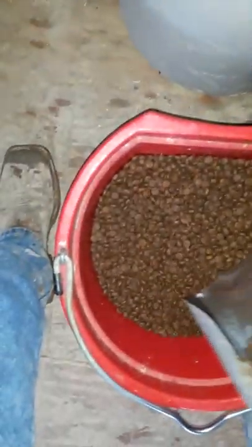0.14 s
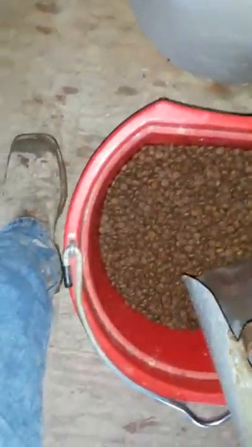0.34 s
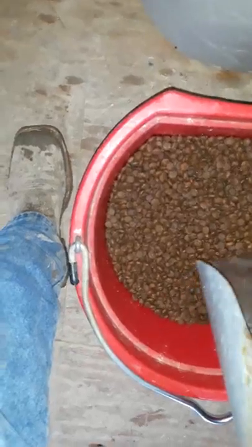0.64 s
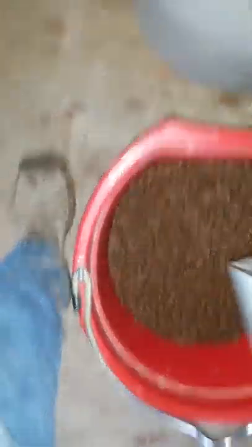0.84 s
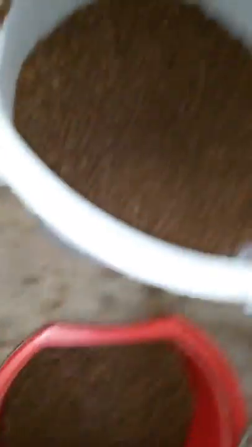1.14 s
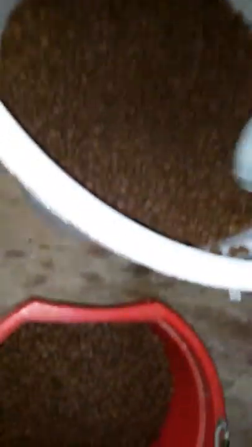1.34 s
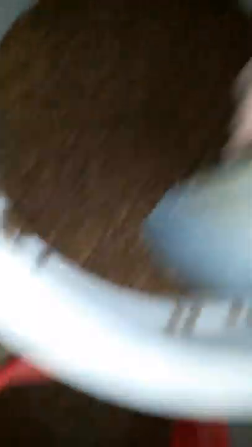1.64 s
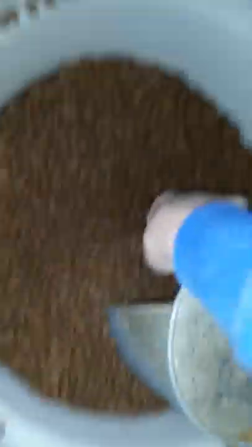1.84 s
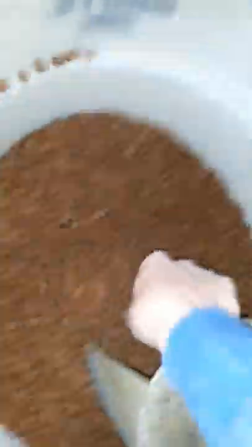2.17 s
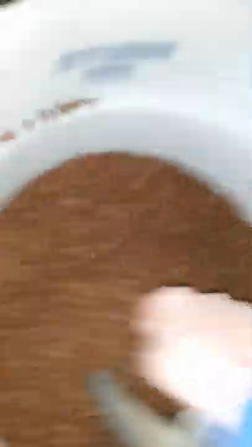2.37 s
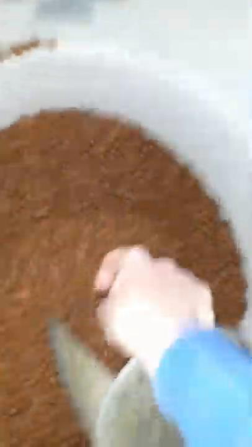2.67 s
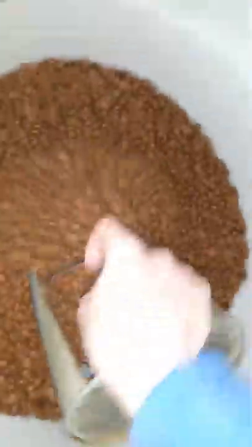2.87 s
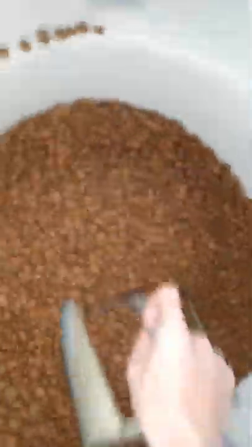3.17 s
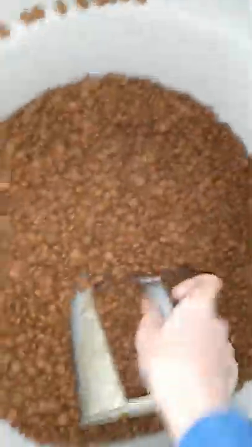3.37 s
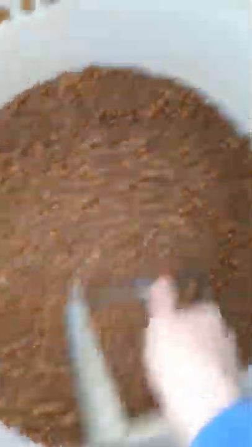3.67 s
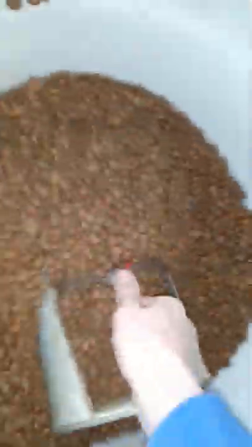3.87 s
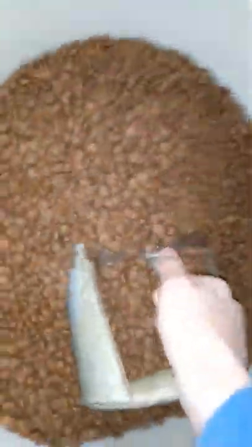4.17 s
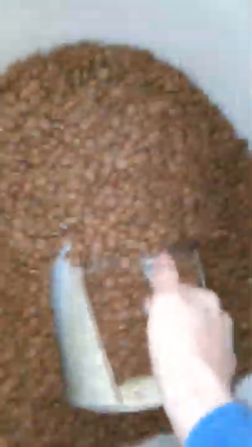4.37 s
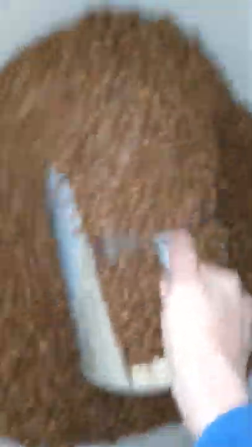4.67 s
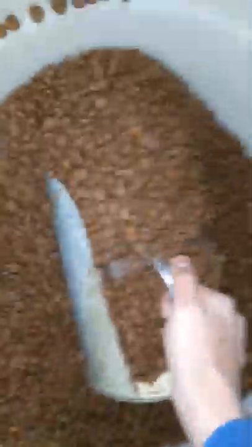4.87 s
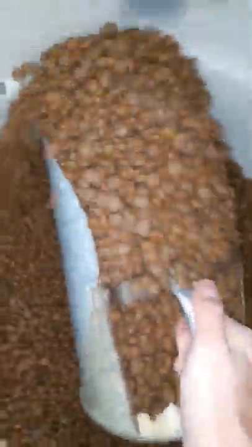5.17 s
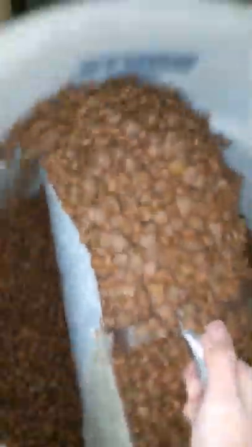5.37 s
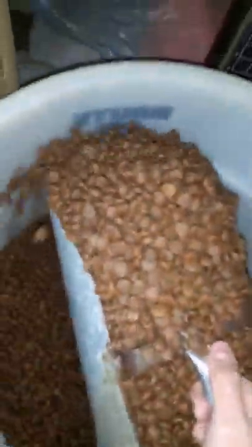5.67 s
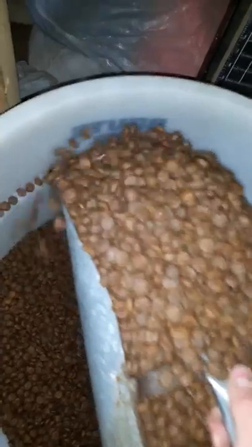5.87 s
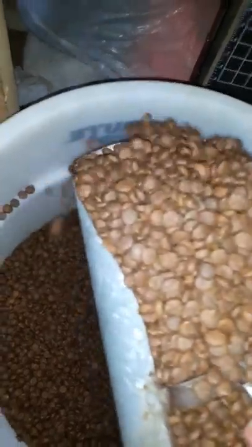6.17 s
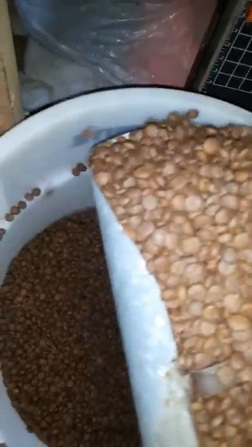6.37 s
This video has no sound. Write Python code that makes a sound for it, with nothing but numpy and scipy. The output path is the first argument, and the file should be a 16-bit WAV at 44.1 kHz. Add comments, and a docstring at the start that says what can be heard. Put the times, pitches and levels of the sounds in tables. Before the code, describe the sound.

Close and dry, with little reverberation: a very short burst of pellets hits a plastic bucket and a metal scoop hums on, dying away. Quiet, then a sudden gritty plunge into a barrel of dry pellets, repeated rough shoves making the barrel thud low. The grinding softens into dull, muffled crunches, and finally a bright slide and hollow patter of falling pellets thins to single sharp ticks.

```python
"""You hear dry pellets slide off a steel scoop into a plastic bucket, and the empty scoop rings on.
The scoop plunges into a plastic barrel of kibble, shoved in so the barrel booms, then comes up heaped
as surplus patters back onto the pile. Pellets are streams of tiny random clicks, filtered to a colour;
steel and barrel are fading resonances; a sleeve rustle and a hiss are filtered noise."""
import sys
import numpy as np
from scipy import signal
from scipy.fft import rfft, irfft, next_fast_len
from scipy.io import wavfile
from scipy.ndimage import uniform_filter1d

SR = 44100
rng = np.random.default_rng(int(sys.argv[2]) if len(sys.argv) > 2 else 0)


def to_wav(s):
    """Save 16-bit WAV."""
    ch = np.atleast_2d(s).T  # columns
    pcm = np.round(np.clip(ch, -1, 1) * 32767)  # PCM
    wavfile.write(sys.argv[1], SR, pcm.astype(np.int16))


N = 287091

# All levels in the tables are relative: each source also has an overall gain in its own function.

# Pellets as the scoop rises. Each row: time in seconds, sliding clicks in dB, patter on the pile in dB.
LIFT = [(4.99, -39.5, -36), (5.04, -41.5, -26), (5.21, -41, -32.5), (5.65, -32.5, -36), (5.87, -38, -41),
        (5.925, -42, -52), (5.99, -36.5, -39.5), (6.17, -36.5, -41.5), (6.25, -43.5, -46.5),
        (6.51, -40, -43.5)]
# How busy the pellets are. Each row: time in seconds, collisions per second before a stream's own factor.
TRAFFIC = [(0, 6000), (.25, 595), (1.45, 517), (1.51, 12000), (2, 4000), (3.25, 4000), (3.4, 510),
           (3.7, 3500), (5.1, 2400), (5.8, 1407), (6.5, 434)]
# Where the pellets lie. Each row: time in seconds, bearing from -1 (right) to 1 (left).
BEARING = [(0, 0.0687), (3.2, 0.012), (3.7, .8), (6.5, 0.432)]
# The scoop jolts against the packed pile. Each row: time in seconds, barrel boom peak in dB,
# scoop clunk peak in dB.
JOLTS = [(1.620, -6.5, -3), (1.642, -10.5, -24.5), (2.172, -5.5, -6.5), (2.294, -24, -18.5),
         (2.322, -21.5, -17.5), (2.365, -20.5, -19.5), (2.385, -11.5, -30), (2.710, -35.5, -24),
         (3.663, -40, -18), (3.672, -42.5, -14), (3.687, -54.5, -17.5), (4.711, -43, -19),
         (5.041, -29, -23.5)]
# Single pellets that stand out. Each row: time in seconds, level in dB.
TICKS = [(0.2059, -57.5), (0.406, -32.5), (1.924, -34.5), (1.952, -21.5), (3.305, -24.5), (3.374, -29.5),
         (3.4065, -38), (4.8915, -19.5), (5.3458, -22.5), (5.8336, -17), (5.9567, -19), (6.0088, -15.5),
         (6.2552, -22), (6.2766, -23), (6.309, -22), (6.3697, -18), (6.4125, -16.5), (6.4228, -15)]
# Tones of the empty steel scoop. Each row: pitch in Hz, level in dB, time to fade by 60 dB in seconds.
STEEL = [(328, -11.5, 1.4), (572, -16, .4), (603, -8.5, .4), (858, -26, .5), (1098, -13.5, .78),
         (1427, -14.5, .7), (1637, -21, .6), (1863, -21, .7), (1938, -7, .3), (2046, -11, .37),
         (2100, -12, .45), (2536, -3, .18), (2648, -8, .2)]
# Resonances of the loaded barrel. Each row: pitch in Hz, width in Hz, level in dB.
BARREL = [(128, 24, -4), (188, 38, -5.5), (250, 50, -4.5), (311, 15, 7.5), (470, 70, -14)]
# Resonances of the scoop, damped by pellets around it. Each row: pitch in Hz, width in Hz, level in dB.
BURIED = [(551, 70, -2), (671.2, 38, 7), (872.5, 48, -2.5), (938, 100, -3)]

# Colours: how strong each pitch is. Each row of these tables: pitch in Hz, level in dB.
# Pellets falling into the bucket.
BUCKET = [(150, -58), (250, -21.5), (325, -12.5), (519, -27), (607, -7), (735, -27.5), (1080, -20),
          (2090, -7), (2360, -11.5), (2570, -9.5), (6940, -12.5), (8260, -24), (16000, -24.5)]
# Pellets grinding on the scoop.
CRUNCH = [(290, -18), (500, 0), (807, -6), (946, -4.5), (1230, -10.5), (1930, -5), (3200, -5), (4340, -2),
          (5970, -5.5), (7100, -1), (8700, -16), (12500, -7), (15100, -16), (16000, -33.5)]
# The scoop clattering before it is buried.
PLUNGE = [(120, -32), (200, -21.5), (289, 9), (366, -25.5), (601, -4), (696, -6.5), (806, -2.5),
          (1270, -5.5), (1980, 1.5), (3830, -0.5), (4770, -3.5), (11900, -11), (16000, -24)]
# The dull thrum of the pile.
THRUM = [(29, -51), (50, -40), (80, -22.5), (124, -10), (180, -16.5), (255, 0.5), (355, -3.5), (1050, -7),
         (1380, -8), (1940, -5), (2400, -9.5), (3120, -25), (5280, -120)]
# The first surplus landing on the pile.
COLLAPSE = [(88, -81), (150, -22), (315, -20), (345, -8.5), (532, -7.5), (640, -3), (927, 3.5), (1260, -11),
            (2850, -12.5), (3300, -17.5), (6000, -35), (7800, -72.5), (13200, -120)]
# Pellets sliding on the scoop.
SLIDE = [(650, -45.5), (1100, -8), (1410, 1), (1720, -2.5), (1970, -0.5), (3570, -5), (4030, -1.5),
         (7060, -2), (8840, -13), (12000, -3.5), (15100, -13.5), (16000, -12)]
# The deeper pats that follow.
PATTER = [(59, -59), (100, -26), (226, -16.5), (274, -9), (444, -14.5), (581, -2), (800, 3), (1060, -7.5),
          (1300, -30.5), (1690, -25), (2860, -120)]
# The background hiss.
AIR = [(30, -0.5), (200, 0.5), (480, 11), (750, 0.5), (2000, 0), (7200, -11), (8500, -16.5), (16000, -24)]

# The scoop first cuts into the pile. One row: start in seconds, attack in seconds, hold in seconds,
# release time constant in seconds, crunch in dB, barrel boom in dB.
STAB = (1.499, 0.0113, 0.0994, 0.0004, -14.5, -36.5)
# Hard shoves. Each row: time at full force in seconds, hold in seconds, creep of pellets while
# the hand leans in, in dB, crunch in dB, barrel boom in dB.
SHOVES = [(1.65, 0.1619, -25, -17.5, -23.5), (1.852, 0.0226, -30, -31, -26.5),
          (2.114, 0.0534, -30, -19.5, -25), (2.399, 0.0537, -30, -18, -25),
          (2.668, 0.04774, -37, -21.5, -26.5), (2.925, 0.0506, -37.5, -19, -26.5),
          (3.007, .004, -45.5, -22.5, -51), (3.046, 0.0032, -45.5, -31, -50.5),
          (3.186, 0.0224, -36, -18.5, -32.5), (3.233, 0.0125, -48, -26, -42)]
# Gentler wiggles with the scoop buried. Each row: time at full force in seconds, hold in seconds,
# crunch in dB, thrum of the pile in dB.
WIGGLES = [(3.66, 0.0432, -36.5, -35), (3.763, 0.0294, -25, -30.5), (3.956, 0.034, -29.5, -33.5),
           (4.115, 0.004, -39.5, -39.5), (4.242, 0.0132, -28.5, -35), (4.366, 0.027, -30, -36),
           (4.473, 0.0832, -34.5, -32), (4.597, 0.0328, -30, -32.5), (4.714, 0.0492, -29, -34)]
# Pellets settling between the shoves. Each row: time in seconds, level in dB.
DIG_SETTLING = [(1.5, -60), (1.65, -54), (1.96, -34), (2.23, -49), (2.8, -46), (3.28, -52.5), (3.36, -60.5),
                (3.6, -74.5)]
# Pellets settling between the wiggles. Each row: time in seconds, level in dB.
FILL_SETTLING = [(3.6, -63), (3.645, -46), (3.92, -45.5), (4.17, -50), (4.4, -35.5), (4.78, -36),
                 (4.92, -42.5), (4.99, -44)]

MIC_LAG_S = .0004  # delay between the two microphones at bearing 1
TOP_HZ = 16200  # nothing is heard above this
RISE_DB_PER_S, FALL_DB_PER_S = 419, 403  # how fast a stroke takes hold and lets go
LEAN_S = 0.1202  # the hand leans in for this long before a shove
BOOM_LAG_S, BOOM_FALL_DB_PER_S = .008, 395.5  # the barrel answers late; how fast its shaking stops
SETTLING_BOOM_DB, SETTLING_THRUM_DB = -5, -2.5  # dull part of the settling, over its crunch gain


def amp(db):
    """Turn decibels into a gain."""
    return 10 ** (np.asarray(db) / 20)


def unit(x):
    """Scale to an average strength (rms) of 1."""
    return x / np.sqrt(np.mean(x ** 2) + 1e-20)


def follow(rows):
    """Draw straight lines through (seconds, value) rows, one value per sample."""
    return np.interp(np.arange(N) / SR, *np.transpose(rows))


def gains(rows):
    """Give one gain per sample for each dB column, practically silent outside the rows."""
    t = np.arange(N) / SR
    times, *columns = np.transpose(rows)
    return [amp(np.interp(t, times, column, left=-120, right=-120)) for column in columns]


def through(x, response):
    """Filter a sound by convolving it with an impulse response."""
    return signal.fftconvolve(np.atleast_2d(x), np.atleast_2d(response), axes=1)[:, :N]


def colour(points, size=4096):
    """Build a filter of energy 1 with the given colour, which never answers before its input."""
    hz, db = np.transpose(points)
    log_hz = np.log(np.fft.rfftfreq(size, 1 / SR) + 1)
    gain = amp(np.interp(log_hz, np.log(hz + 1), db))
    # Folding the cepstrum forward gives the minimum-phase filter.
    cepstrum = irfft(np.log(np.maximum(gain, 1e-6)))
    cepstrum[1:size // 2] *= 2
    cepstrum[size // 2 + 1:] = 0
    response = irfft(np.exp(rfft(cepstrum)))
    return response / np.linalg.norm(response)


def shift_colour(x, before, after, start, end):
    """Pass the colour of a sound from one spectrum to another between two times."""
    turn = follow([(start, 0), (end, np.pi / 2)])
    return through(x * np.cos(turn), colour(before)) + through(x * np.sin(turn), colour(after))


def body(modes, detune=1):
    """Ring a struck object: a sum of fading tones, of energy 1; wider resonances fade faster."""
    t = np.arange(SR // 2) / SR
    response = np.zeros(len(t))
    for k, (hz, width, db) in enumerate(modes):
        tone = np.exp(-np.pi * width * t) * np.sin(2 * np.pi * hz * detune * t)
        response += (-1) ** k * amp(db) * width * tone
    return response / np.linalg.norm(response)


def aside(x, bearing):
    """Place a sound on the left: it reaches the right microphone a little later."""
    return np.array([x, np.roll(x, round(bearing * MIC_LAG_S * SR))])


def add_shapes(starts, shapes):
    """Add up short shapes in both channels, each from its own start sample."""
    index = np.arange(shapes.shape[1])
    return np.array([np.bincount((start + index).ravel(), shapes.ravel(), N)[:N] for start in starts])


def clicks(times, sizes, bearing=0, scatter=1, life=0.0001292, size=48):
    """Make tiny collisions, each with a random pitch and direction; life is the fade time in seconds."""
    pitch, phase, stray = rng.random((3, len(times), 1))
    t = np.arange(size) / SR
    shapes = np.exp(-t / life) * np.cos(2 * np.pi * (pitch * TOP_HZ * t + phase))
    shapes *= sizes[:, None] / np.linalg.norm(shapes, axis=1, keepdims=True)
    lag = MIC_LAG_S * (np.reshape(bearing, (-1, 1)) + scatter * (2 * stray - 1))
    starts = [np.abs((times[:, None] + side * lag / 2) * SR).astype(int) for side in (-1, 1)]
    return add_shapes(starts, shapes)


def pellets(busy, spread_db, clump_db, scatter=0.39):
    """Stream random collisions of rms 1: sizes vary, and slow noise bunches them into tiny avalanches."""
    rate = np.maximum(busy * follow(TRAFFIC), 1)
    hit = np.flatnonzero(rng.random(N) < rate / SR)
    clumps = unit(uniform_filter1d(rng.standard_normal(N), size=300))
    strength_db = spread_db * np.minimum(rng.standard_normal(N), 2) + clump_db * clumps
    sizes = amp(strength_db) / np.sqrt(rate)  # busier streams have smaller clicks
    return unit(clicks(hit / SR, sizes[hit], follow(BEARING)[hit], scatter))


def surround_noise():
    """Make noise from all sides: alike at both microphones in the bass, unrelated in the treble."""
    size = next_fast_len(N)
    alike = np.sinc(2 * MIC_LAG_S * np.fft.rfftfreq(size, 1 / SR))
    shares = np.sqrt([(1 + alike) / 2, (1 - alike) / 2])
    mid, side = irfft(rfft(rng.standard_normal((2, size))) * shares, size)[:, :N]
    return np.array([mid + side, mid - side])


def walls(x, t60, wet_db):
    """Scatter clicks off close walls: a short noise wash follows their energy, total kept about the same."""
    decay = amp(-60 * np.arange(SR // 4) / SR / t60) ** 2
    energy = through(np.mean(x ** 2, axis=0), decay / decay.sum())
    wash = np.sqrt(np.abs(energy)) * surround_noise()
    return (x + amp(wet_db) * wash) / np.hypot(1, amp(wet_db))


def room(x, t60, wet_db, low_hz=600, size=12000):
    """Add the answer of the nearby surroundings: a fading noise tail that returns little bass."""
    tail = surround_noise()[:, :size] * amp(-60 * np.arange(size) / SR / t60)
    bright = signal.sosfilt(signal.butter(2, low_hz, "highpass", fs=SR, output="sos"), x[0])
    return x + amp(wet_db) * through(bright, tail / np.linalg.norm(tail[0]))


def together(parts):
    """Combine the gains of unrelated pellet movements: their powers add."""
    return np.sqrt(sum(part ** 2 for part in parts))


def stroke(start, hold, db, fall_db_per_s):
    """Shape one push of the hand: it takes hold, stays at full force and lets go."""
    t = np.arange(N) / SR - start
    rising = RISE_DB_PER_S * np.maximum(-t, 0)
    falling = fall_db_per_s * np.maximum(t - hold, 0)
    return amp(db - rising - falling)


def air():
    """A very faint, even background hiss: coloured random noise."""
    return amp(-68.5) * through(rng.standard_normal((2, N)), colour(AIR))


def sleeve(fastest_s=1.17, width_s=.36):
    """The sleeve rustles faintly as the arm swings from bucket to barrel, loudest when fastest."""
    speed = np.exp(-((np.arange(N) / SR - fastest_s) / width_s) ** 2)
    return amp(-66) * speed * through(surround_noise(), colour(CRUNCH))


def ticks(bounce_s=0.0016, count=3):
    """Single pellets strike steel or plastic and chatter for an instant, each bounce 2 dB weaker."""
    s, db = np.transpose(TICKS)
    order = np.arange(count)
    times = s[:, None] + bounce_s * order * rng.uniform(0.66, 1, (len(s), count))
    strikes = clicks(times.ravel(), amp(db[:, None] - 2 * order).ravel())
    return amp(8.5) * through(walls(strikes, t60=0.0885, wet_db=-6.0), colour(SLIDE))


def clacks(per_s=90, middle_hz=1900, spread_octaves=.55, spread_db=3.5, life_s=.0025, size=900):
    """Pellets that fall clear of the scoop land with short pitches of their own; dry ones hardly ring."""
    slide, _ = gains(LIFT)
    hit = np.flatnonzero(rng.random(N) < per_s / SR)
    pitch, strength, bearing = rng.standard_normal((len(hit), 3)).T[:, :, None]
    t = np.arange(size) / SR
    hz = middle_hz * 2 ** (spread_octaves * pitch)
    rings = amp(spread_db * strength) * np.exp(-t / life_s) * np.sin(2 * np.pi * hz * t)
    lag = np.tanh(bearing) * MIC_LAG_S * SR / 2
    starts = [np.abs(hit[:, None] + side * lag).astype(int) for side in (-1, 1)]
    return amp(-5.5) * slide * unit(add_shapes(starts, rings))


def scoop_ring(attack_s=0.025):
    """Freed of its load, the steel rings as a sum of fading tones; its lowest tone lasts longest."""
    t = np.arange(N) / SR
    phases = rng.uniform(0, 2 * np.pi, len(STEEL))
    sides = np.array([[1], [-1]])
    lags = rng.uniform(-.22, .22, len(STEEL))[:, None, None] * MIC_LAG_S * sides
    ring = np.zeros((2, N))
    for (hz, db, t60), phase, lag in zip(STEEL, phases, lags):
        fade = amp(db - 60 * np.maximum(t - .06, 0) / t60)  # fading starts at 0.06 s
        ring += fade * np.sin(2 * np.pi * hz * (t + lag) + phase)
    return amp(-32.0) * ring * (1 - np.exp(-t / attack_s))


def pour():
    """The stream into the bucket thins out fast; a few stragglers follow, fading more slowly."""
    t = np.arange(N) / SR
    main_stream = amp(-15.5 - 224.3 * t)  # falls by 224.3 dB per second
    stragglers = amp(-40 - 72 * t)
    level = together([main_stream, stragglers])
    stream = level * pellets(busy=1.1, spread_db=5, clump_db=2.5)
    return amp(-5.0) * through(walls(stream, t60=.12, wet_db=-1.0), colour(BUCKET))


def lift():
    """Surplus pellets fall back with bright clicks and hollow pats that deepen as the scoop comes free."""
    slide, patter = gains(LIFT)
    sliding = slide * pellets(busy=1.2, spread_db=3.5, clump_db=2.35)
    sliding = walls(sliding, t60=0.03, wet_db=2.5)
    landing = patter * pellets(busy=.9, spread_db=2.5, clump_db=0.48, scatter=0.88)
    landing = walls(landing, t60=0.2, wet_db=-3.5)
    pats = shift_colour(landing, COLLAPSE, PATTER, start=5.062, end=5.3)
    return amp(3.5) * through(sliding, colour(SLIDE)) + amp(2.0) * pats


def filling_effort():
    """Gains of crunch and thrum: the pile starts to move again, with wiggles over its settling."""
    settling, = gains(FILL_SETTLING)
    moving = follow([(FILL_SETTLING[0][0], 0), (FILL_SETTLING[1][0], 1)])
    crunch, thrum = [settling], [amp(SETTLING_THRUM_DB) * settling]
    for s, hold, crunch_db, thrum_db in WIGGLES:
        crunch.append(stroke(s, hold, crunch_db, FALL_DB_PER_S))
        thrum.append(stroke(s, hold, thrum_db, BOOM_FALL_DB_PER_S))
    return moving * together(crunch), moving * together(thrum)


def fill():
    """Deep in the pile the scoop crunches more softly over a dull thrum: two coloured pellet streams."""
    crunch, thrum = filling_effort()
    grinding = walls(crunch * pellets(busy=.9, spread_db=5, clump_db=1.8), t60=.05, wet_db=-2)
    shifting = thrum * pellets(busy=.3, spread_db=1.5, clump_db=-1.5)
    return amp(2.5) * through(grinding, colour(CRUNCH)) + amp(2.0) * through(shifting, colour(THRUM))


def jolts(contact_s=0.000374, boom_lag_s=0.0047):
    """The scoop slips and stops: a short clunk of buried steel, then the push reaches the barrel wall."""
    out = np.zeros(N + SR)
    t = np.arange(SR // 50) / SR
    push = t / contact_s * np.exp(-t / contact_s)
    boom = np.convolve(body(BARREL), push)
    detunes = rng.normal(1, 0.0743, len(JOLTS))  # each clunk has its own pitch
    for (s, boom_db, clunk_db), detune in zip(JOLTS, detunes):
        clunk = body(BURIED, detune)
        for start, db, ring in (s, clunk_db, clunk), (s + boom_lag_s, boom_db, boom):
            out[round(start * SR):][:len(ring)] += amp(db) * ring / np.abs(ring).max()
    # The left channel is slightly louder and hears it first.
    return aside(out[:N], bearing=0.533) * amp([[.9], [-.9]])


def digging_effort():
    """Gains of crunch and boom: one sudden stab, then shoves that each begin with a slow lean."""
    start, attack, hold, release, stab_crunch_db, stab_boom_db = STAB
    t = np.arange(N) / SR - start
    stab = np.clip(t / attack, 0, 1) * np.exp(-np.maximum(t - attack - hold, 0) / release)
    settling, = gains(DIG_SETTLING)
    crunch = [amp(stab_crunch_db) * stab, settling]
    boom = [amp(stab_boom_db) * stab, amp(SETTLING_BOOM_DB) * settling]
    for s, hold, creep_db, crunch_db, boom_db in SHOVES:
        crunch.append(stroke(s - LEAN_S, LEAN_S, creep_db, FALL_DB_PER_S))
        crunch.append(stroke(s, hold, crunch_db, FALL_DB_PER_S))
        boom.append(stroke(s + BOOM_LAG_S, hold, boom_db, BOOM_FALL_DB_PER_S))
    return together(crunch) * (t > 0), together(boom) * (t > 0)


def dig():
    """Shoves grind pellets on steel and shake the barrel; the scoop clatters most before it is buried."""
    crunch, boom = digging_effort()
    grinding = walls(crunch * pellets(busy=1.3, spread_db=4, clump_db=1.4), t60=.05, wet_db=-2)
    knocks = boom * pellets(busy=0.43, spread_db=4.0, clump_db=-2.0)
    shaking = aside(through(knocks, body(BARREL))[0], bearing=0.616)
    return amp(-0.5) * shift_colour(grinding, PLUNGE, CRUNCH, start=1.338, end=1.768) + shaking


def scene():
    """Mix all sources, add the answer of the surroundings, and lay the hiss beneath."""
    handling = sleeve() + ticks() + clacks() + scoop_ring() + pour()
    near = handling + lift() + fill() + jolts() + dig()
    return room(near, t60=0.1102, wet_db=-8) + air()


def record(dry, low_hz=65):
    """The small microphone loses the deep bass and keeps nothing above its band limit."""
    thin = signal.sosfilt(signal.butter(2, low_hz, "highpass", fs=SR, output="sos"), dry)
    size = next_fast_len(N + SR // 2)
    edge = np.clip((TOP_HZ - np.fft.rfftfreq(size, 1 / SR)) / 250, 0, 1)  # fades out over 250 Hz
    return irfft(rfft(thin, size) * edge, size)[:, :N]


dry = scene()
out = record(dry)
to_wav(out)
```